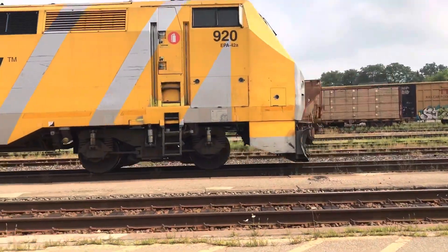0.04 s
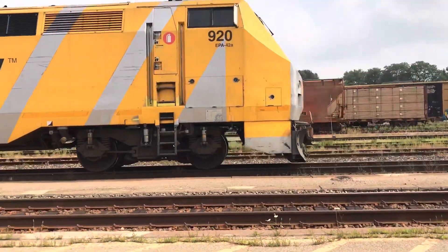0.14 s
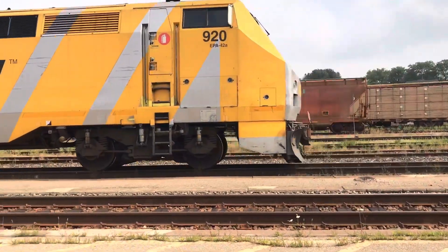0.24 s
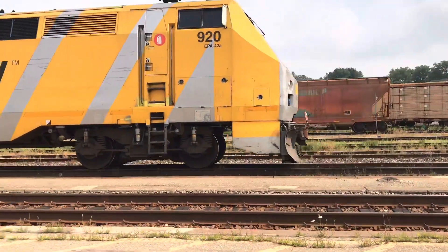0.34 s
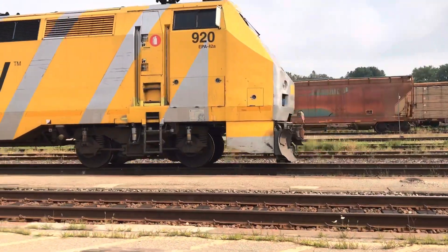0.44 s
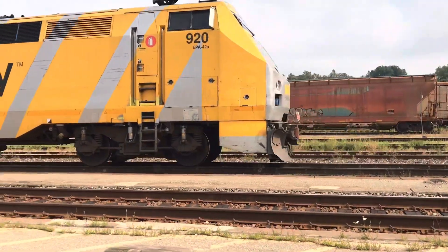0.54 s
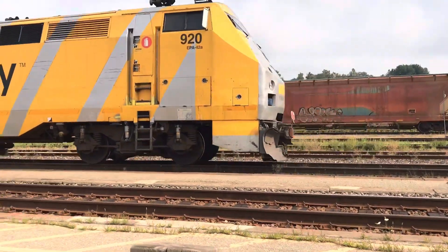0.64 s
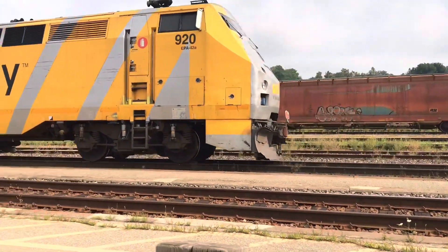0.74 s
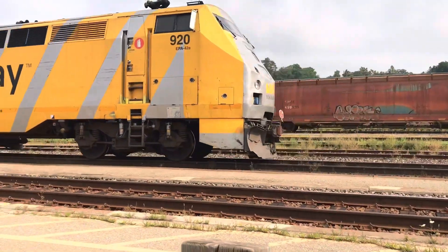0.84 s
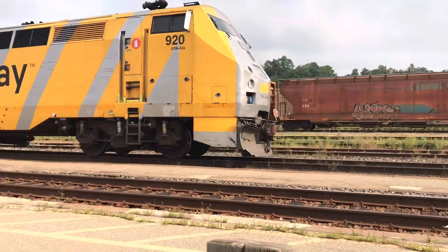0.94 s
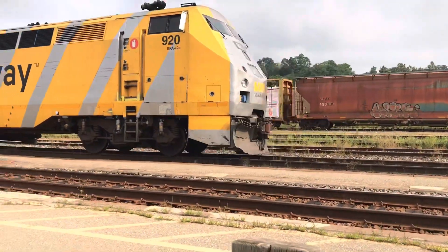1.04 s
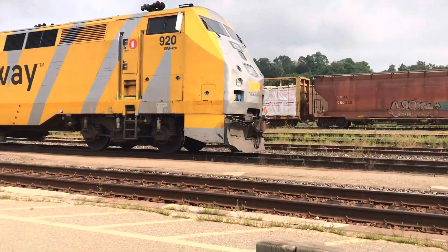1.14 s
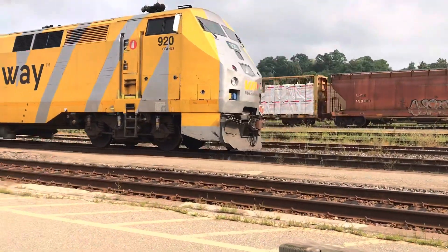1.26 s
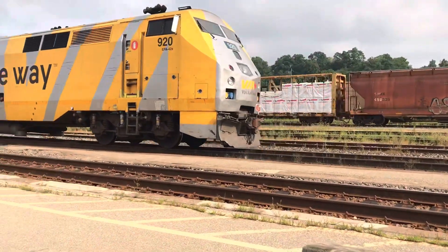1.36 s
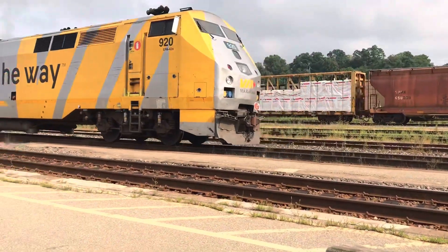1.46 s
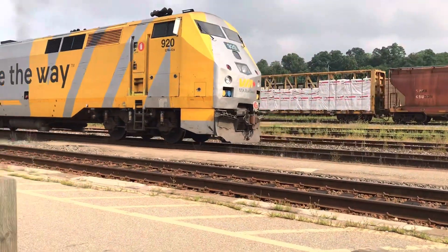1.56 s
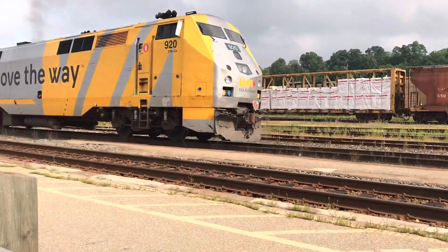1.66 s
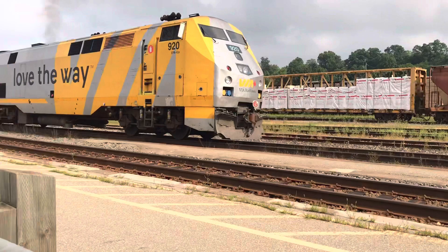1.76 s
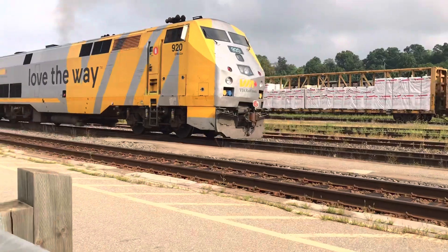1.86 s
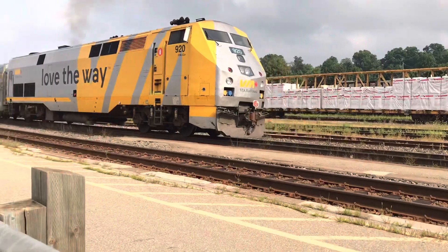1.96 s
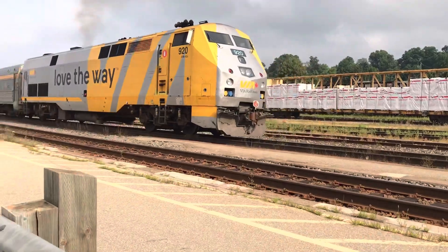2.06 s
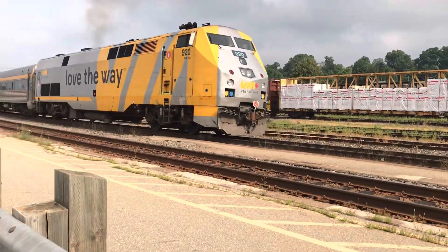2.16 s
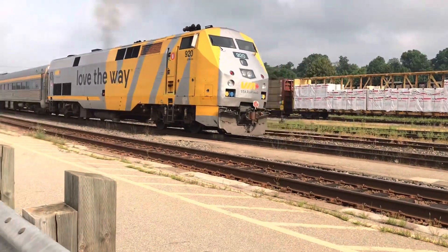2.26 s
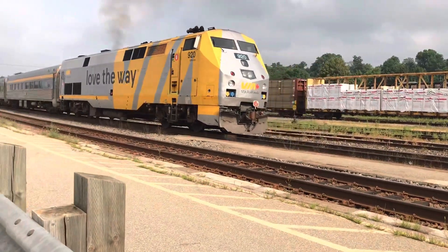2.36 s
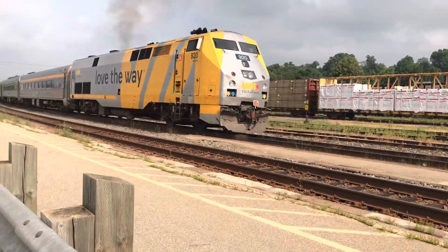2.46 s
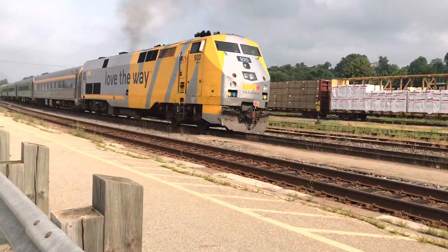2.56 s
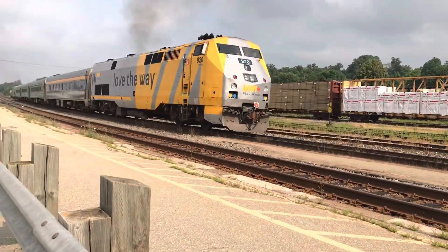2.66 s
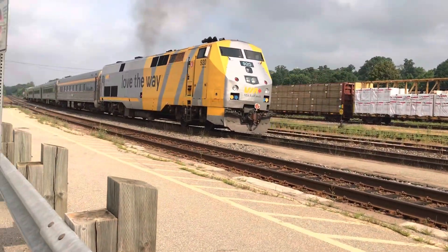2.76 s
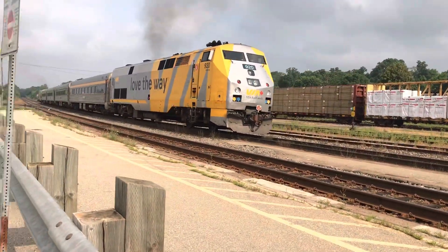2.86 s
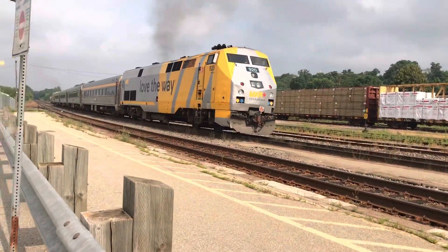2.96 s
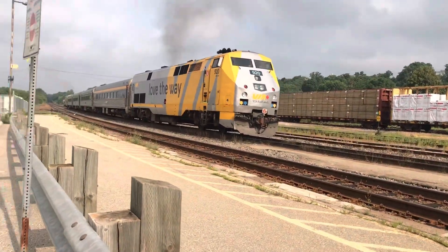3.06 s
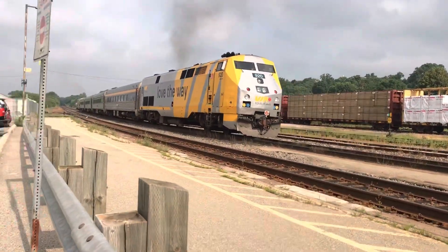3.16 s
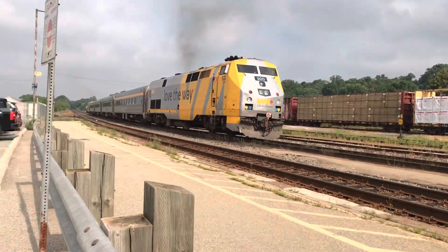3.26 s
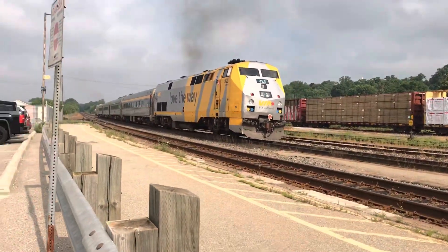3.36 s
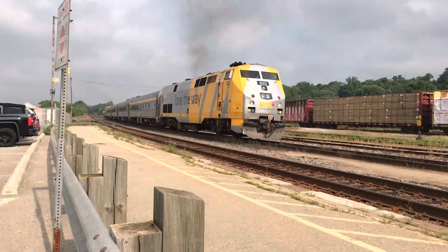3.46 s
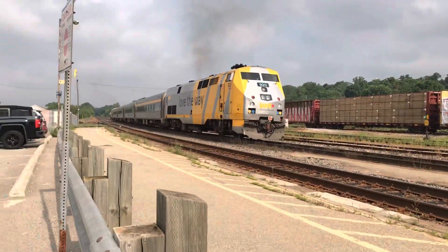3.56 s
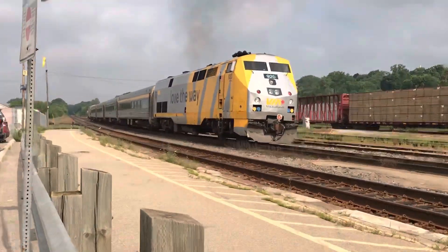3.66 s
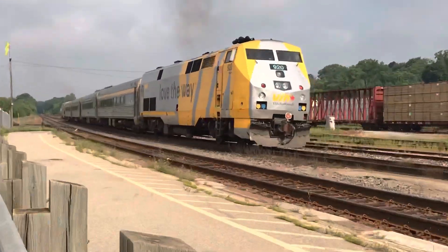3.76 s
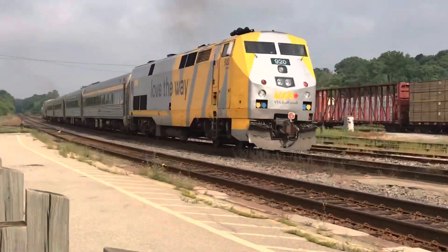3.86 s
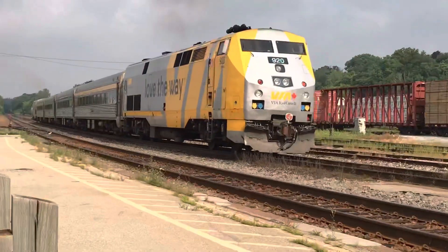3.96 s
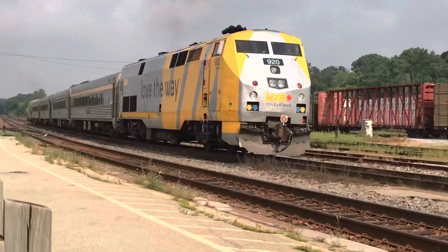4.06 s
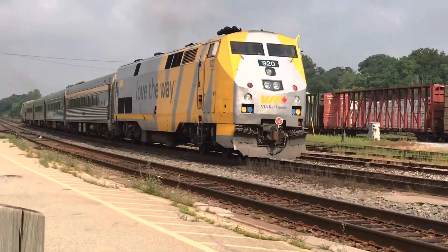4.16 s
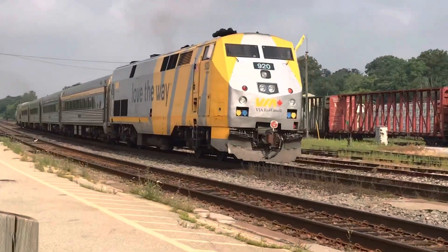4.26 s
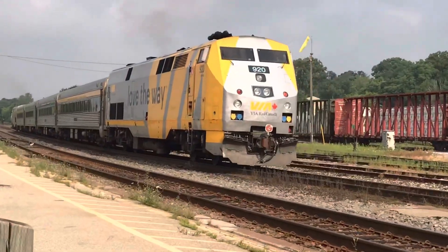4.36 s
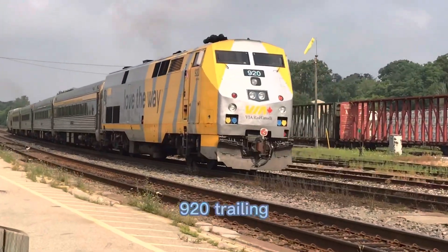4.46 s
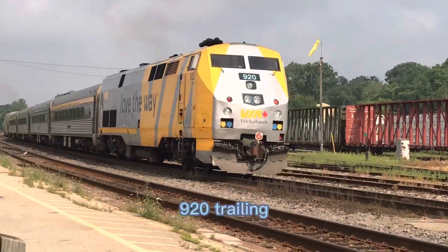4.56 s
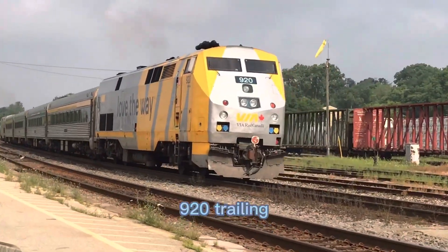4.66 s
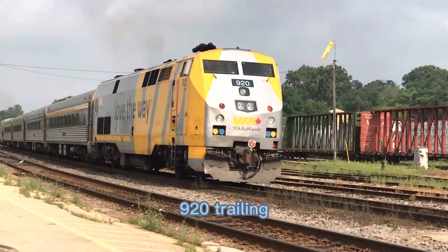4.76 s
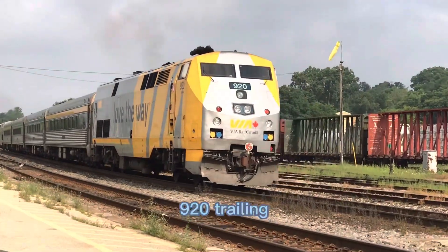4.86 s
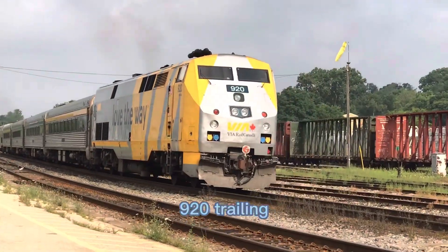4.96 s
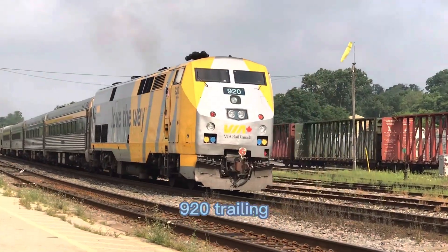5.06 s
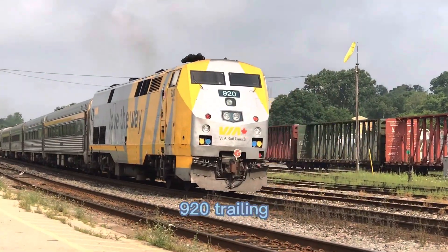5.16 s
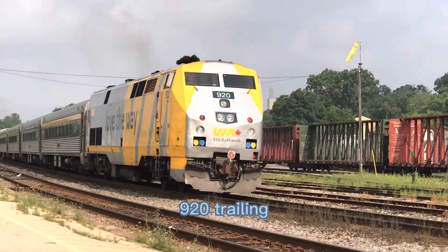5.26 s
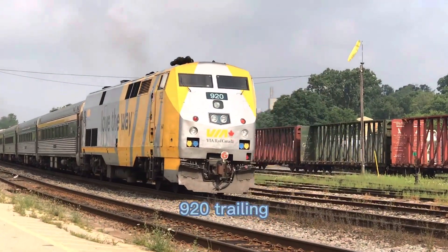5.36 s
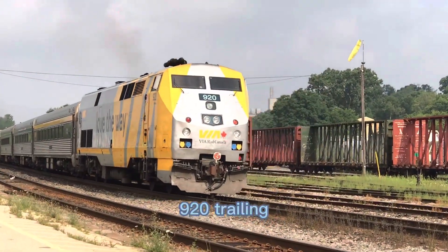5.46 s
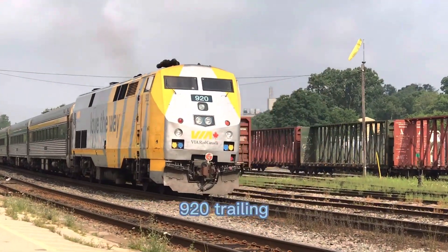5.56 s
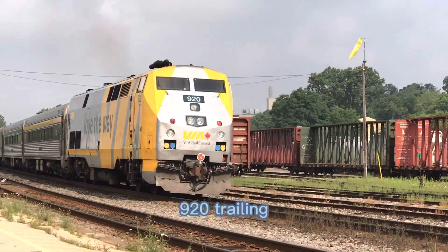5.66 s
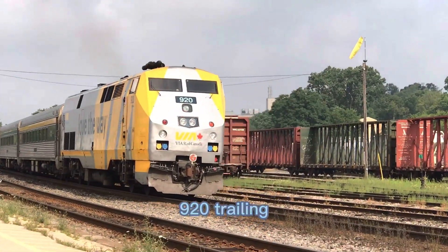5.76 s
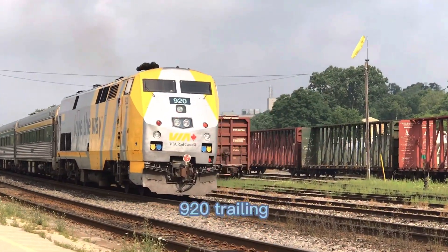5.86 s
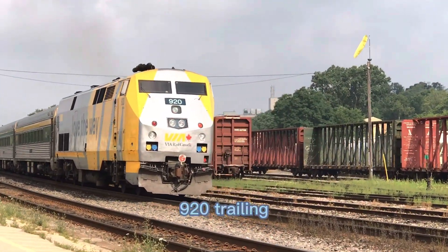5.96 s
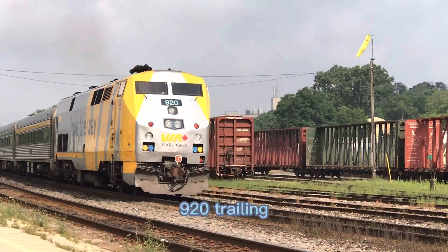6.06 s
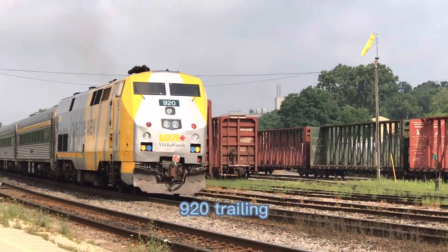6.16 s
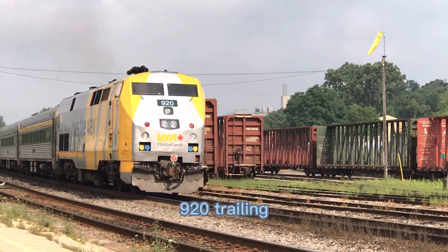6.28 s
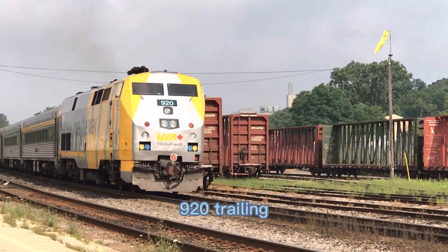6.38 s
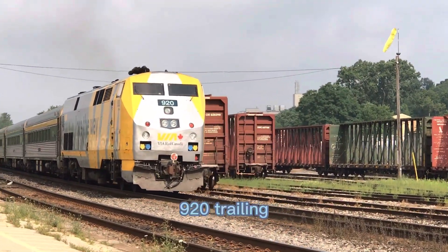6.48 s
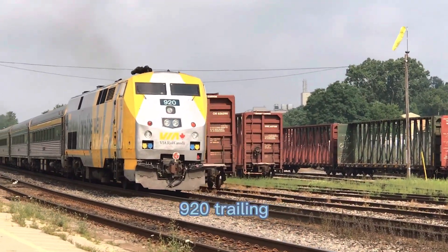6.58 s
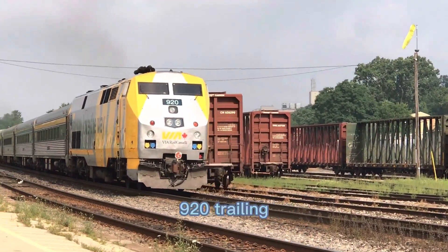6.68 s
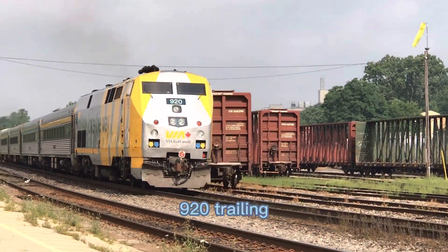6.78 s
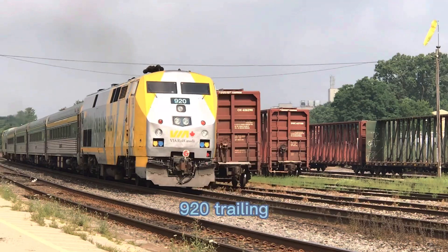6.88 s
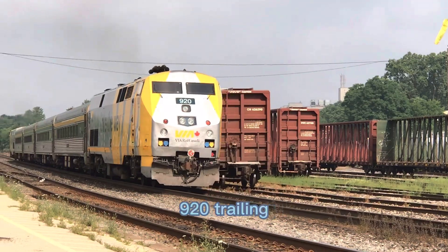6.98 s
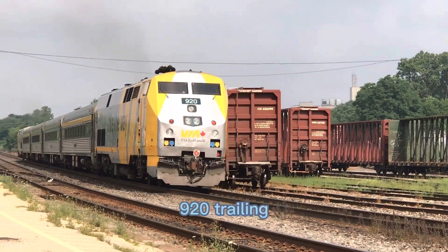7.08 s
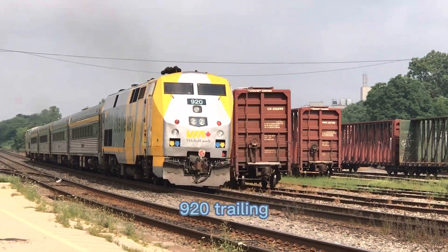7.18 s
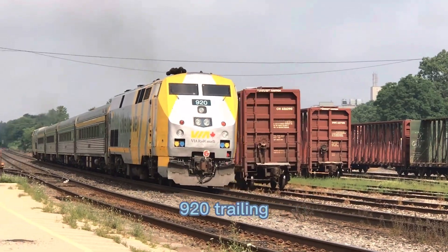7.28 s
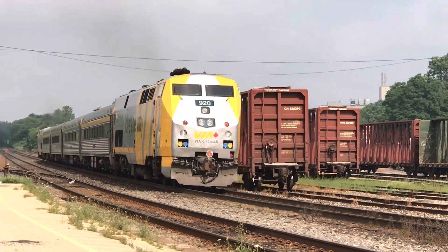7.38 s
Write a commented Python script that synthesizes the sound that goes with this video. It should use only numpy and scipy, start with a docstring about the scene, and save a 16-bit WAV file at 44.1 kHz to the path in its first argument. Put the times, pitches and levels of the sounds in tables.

```python
"""A passenger train rolls slowly out of a station, its idling sixteen-cylinder diesel trailing a few metres away.
From the start the exhaust throbs on multiples of the crank speed, metal clatters with the firings, shaped
noise makes the wheels rumble and scrape, flanges hiss through ringing steel, and rough single notes ring out.
Thumps, knocks and clanks soon follow at the rail joints, most of them in the first three seconds.
Later the rumble fades as the train draws away, an echo thickens the hum, and thin sine tones squeal."""
import sys
import numpy as np
from scipy import signal
from scipy.fft import rfft, irfft, next_fast_len
from scipy.io import wavfile
from scipy.ndimage import uniform_filter1d, map_coordinates

SR = 44100
rng = np.random.default_rng(int(sys.argv[2]) if len(sys.argv) > 2 else 0)


def unload_audio(sound):
    """Save the sound as a 16-bit wav file, at the path given as the first command line argument."""
    columns = np.transpose(np.atleast_2d(sound))
    # keep every value between -1 and 1, then stretch to whole-number steps
    steps = np.round(np.clip(columns, -1, 1) * 32767)
    wavfile.write(sys.argv[1], SR, steps.astype(np.int16))


N = 327663
TIME = np.arange(N) / SR


def undb(db):
    """Turn decibels into a gain."""
    return 10 ** (np.asarray(db) / 20)


def unit(x):
    """Scale to an rms of 1."""
    return x / np.sqrt(np.mean(x ** 2))


def curves(table):
    """Join each column of a table by straight lines in time."""
    seconds, *columns = np.transpose(table)
    return [np.interp(TIME, seconds, column) for column in columns]


def curve(table):
    """Join a table of times and values by straight lines."""
    return curves(table)[0]


def noise():
    """White noise."""
    return rng.standard_normal(N)


def walk(rate):
    """Random levels, each held for 1 / rate seconds and smoothed twice; spread near 1."""
    hold = int(SR / rate)
    steps = np.repeat(noise()[:N // hold + 1], hold)
    return 1.37 * uniform_filter1d(uniform_filter1d(steps, hold), hold)[:N]


def gain_at(hz, spectrum):
    """Read a (Hz, dB) spectrum as gains, with straight lines on a log-frequency axis."""
    points_hz, db = np.transpose(spectrum)
    return undb(np.interp(np.log(hz + 1e-3), np.log(points_hz), db))


def colour(x, spectrum):
    """Filter x by a spectrum; rms 1."""
    size = next_fast_len(N)
    gains = gain_at(np.fft.rfftfreq(size, 1 / SR), spectrum)
    return unit(irfft(rfft(x, size) * gains, size)[:N])


def ring(x, modes):
    """Drive resonances (Hz, width Hz, dB) with x; rms 1."""
    total = 0
    for hz, width_hz, db in modes:
        b, a = signal.iirpeak(hz, hz / width_hz, fs=SR)
        total = total + undb(db) * signal.lfilter(b, a, x)
    return unit(total)


def glide(x, speed):
    """Play x at a changing speed, which moves its whole spectrum; rms 1."""
    return unit(map_coordinates(x, [np.cumsum(speed) % (N - 1)], order=1))


def steel(low_hz, high_hz, width_hz, share, count):
    """Friction noise plus a share of ringing in many sharp modes scattered over a range."""
    places = (np.arange(count) + rng.random(count)) / count
    modes_hz = low_hz + (high_hz - low_hz) * places
    modes_db = 2 * rng.standard_normal(count)
    modes = [(hz, width_hz, db) for hz, db in zip(modes_hz, modes_db)]
    return noise() + share * ring(noise(), modes)


def bout(start, length, attack_s, release_s):
    """Envelope that rises, holds until start + length, then dies away."""
    rise = np.clip((TIME - start) / max(attack_s, 1 / SR), 0, 1)
    return rise * np.exp(-np.maximum(TIME - start - length, 0) / release_s)


def note(hz, width_hz, waver):
    """A rough resonance: a tone wavering by a share of its pitch, roughened to fill its width."""
    pitch_hz = hz * (1 + waver * walk(25)) + .5 * width_hz * walk(150)
    roughness = 1 + .6 * walk(1.5 * width_hz)
    return unit(roughness * np.sin(2 * np.pi * np.cumsum(pitch_hz) / SR))


def streaks(centre_hz, modes):
    """Metal resonances around a moving centre; each wavers, swells and fades on its own."""
    total = 0
    for ratio, db in modes:
        swell = undb(db + 2.2 * walk(16))
        total = total + swell * note(ratio * centre_hz, 70, waver=.008)
    return unit(total)


# How fast the crank spins. Each row: time in seconds, speed in turns per second.
CRANK_SPEED = [(0, 6.83), (.7, 6.945), (1.5, 7.06), (2.3, 7.17), (3.1, 7.28), (3.9, 7.315), (5.1, 7.35),
               (7.43, 7.365)]


def crank_turns():
    """Add up the crank speed into a running count of turns."""
    return np.cumsum(curve(CRANK_SPEED)) / SR


THROB_LEAD = .66  # turns by which the throb leads the crank
SILENCER_SPREAD = .36  # turns per squared multiple; the silencer delays higher lines more, spreading the throb


def crank_line(turns, multiple):
    """One slightly unsteady tone at a multiple of the crank speed."""
    swing = 1 + .06 * (walk(4) + 1j * walk(4))
    phase = multiple * (turns + THROB_LEAD) + SILENCER_SPREAD * multiple ** 2  # in turns
    return np.sqrt(2) * np.real(swing * np.exp(2j * np.pi * phase))


# Exhaust tones in three mixes; only the balance within a mix matters.
# Each row: multiple of the crank speed, level in mix 0 in dB, level in mix 1 in dB, level in mix 2 in dB.
EXHAUST_LINES = [(5, -34, -30, -24), (6, -33, -26, -22), (7, -30, -21, -19), (8, -22, -11, -5),
                 (9, -12, -9, -6), (10, -8, -7, -7), (11, .5, .5, 1), (12, -11, -7, -5), (13, -11, -2, -2),
                 (14, -23, -21, -16), (15, -23, -20, -16), (16, -24, -14, -11), (17, -23, -17, -14)]
# The balance of the exhaust tones, which wanders between the three mixes as reflections shift.
# Each row: time in seconds, mix (0 to 2, blending in between; values outside count as the nearest end).
EXHAUST_BALANCE = [(0, 1.5), (.35, 0.7), (.75, 0.7), (1, -2), (1.3, 0.3), (1.6, 1.3), (2.05, 1.5),
                   (2.4, 0.8), (2.9, 0.84), (3.8, 2.5), (7.4, 2)]
LOPE_DB, LOPE_AT = 1.1, .66  # the strongest cylinders swell the exhaust once a turn, at this share of it
BURN_SCATTER_DB = .5  # uneven burning at idle


def exhaust(turns):
    """Low crank multiples beat into a throb; their balance wanders as reflections shift."""
    mix = curve(EXHAUST_BALANCE)
    total, power = 0, 0
    for multiple, *mixes_db in EXHAUST_LINES:
        gain = undb(np.interp(mix, np.arange(len(mixes_db)), mixes_db))
        total = total + gain * crank_line(turns, multiple)
        power = power + gain ** 2
    lope_db = LOPE_DB * np.cos(2 * np.pi * (turns - LOPE_AT))
    return undb(lope_db + BURN_SCATTER_DB * walk(12)) * total / np.sqrt(power)


def firing(turns):
    """Eight firings a turn, each a dying burst; the two cylinder banks take turns and one hits harder."""
    beat = 8 * turns
    index = beat.astype(int)
    pattern = np.array([2.04, 0.49, 1.15, 0.87, 1.74, -1.1, 1.5, -2.2])  # in steps of 3 dB
    strength = undb(3.0 * pattern[index % len(pattern)] + 2.5 * noise()[index])
    burst = np.exp(-(beat % 1) / 0.96)
    return unit(uniform_filter1d(strength * burst, size=60))


def drone(turns, gate, spectrum):
    """The car body hums with a pattern that repeats each turn, roughened by gas puffs."""
    multiples = np.arange(18, 64)
    size = 4096  # points in one turn of the pattern
    strength = gain_at(multiples * CRANK_SPEED[-1][1], spectrum)  # placed for the final crank speed
    lines = np.zeros(size // 2 + 1, complex)
    lines[multiples] = strength * np.exp(2j * np.pi * rng.random(len(multiples)))
    hum = np.interp(turns % 1, np.arange(size) / size, irfft(lines))
    hum = hum * undb(1.5 * walk(7.4))  # slow unsteadiness
    puffs = colour(noise() * gate, spectrum)
    return unit(unit(hum) + 0.3 * puffs)


# The parked freight cars throw the hum back, stronger and ever sooner as the locomotive draws away.
ECHO_DELAY_S, ECHO_SHRINK_S_PER_S = .1575, .01
ECHO_NEAR, ECHO_FAR, ECHO_FULL_S = .08, .55, 3.8  # gains, and the time of the full echo
DRONE_PEAK_S = 2.1  # the drone is loudest and the echo starts to grow


def yard_echo(x):
    """Add the moving echo, which makes the engine's lines fade and swell one after another."""
    delay = ECHO_DELAY_S - ECHO_SHRINK_S_PER_S * TIME
    gain = np.interp(TIME, [DRONE_PEAK_S, ECHO_FULL_S], [ECHO_NEAR, ECHO_FAR])
    return (x + gain * np.interp(TIME - delay, TIME, x)) / np.sqrt(1 + gain ** 2)


# Loudness of the exhaust before its echo. Each row: time in seconds, level in dB.
EXHAUST_LOUDNESS = [(0, -19), (.45, -18), (.8, -14.5), (1.2, -15), (1.7, -19.5), (2.5, -14.5), (2.9, -18.5),
                    (3.15, -25.5), (3.4, -18), (3.75, -22), (5.6, -24), (6.4, -24.5), (7.43, -23.5)]
# Tone balance of the body hum early on. Each row: frequency in Hz, relative level in dB.
EARLY_DRONE = [(110, -25), (135, 6), (160, -3), (180, 1.5), (195, 2), (204, 8), (213, 3), (240, -3),
               (280, -8), (325, -9), (360, -21), (450, -25), (650, -22)]
# Tone balance of the body hum later. Each row: frequency in Hz, relative level in dB.
LATE_DRONE = [(110, -30), (140, -3), (165, 0), (180, 2), (205, 3), (220, -2), (245, -7), (264, 3),
              (277, -6), (294, 1), (306, -6), (328, 1), (360, -11.5), (450, -16), (650, -45)]
DRONE_DB, DRONE_FADE_DB_PER_S = -28.5, 1.43  # level at the peak; weaker before and after


def engine_hum(turns, gate):
    """Exhaust throb and body drone, together with their echo."""
    late = np.clip((TIME - 3.3) / 1.9, 0, 1)  # the hum's tone balance changes smoothly
    early_part = np.sqrt(1 - late) * drone(turns, gate, EARLY_DRONE)
    late_part = np.sqrt(late) * drone(turns, gate, LATE_DRONE)
    drone_db = DRONE_DB - DRONE_FADE_DB_PER_S * np.abs(TIME - DRONE_PEAK_S)
    throb = undb(curve(EXHAUST_LOUDNESS)) * exhaust(turns)
    return yard_echo(throb + undb(drone_db) * (early_part + late_part))


# Steady clatter of the engine metal. Each row: time in seconds, block level in dB, rattling panels level in dB.
STEADY_CLATTER = [(0, -44, -43.5), (.7, -38, -41.5), (1.9, -41, -41.5), (2.7, -41.5, -35),
                  (3.6, -41, -37.5), (4.5, -37, -38.5), (4.95, -33.5, -39.5), (5.3, -27.5, -34),
                  (5.75, -32, -38), (6.15, -33, -34), (6.36, -36.5, -38), (6.48, -35, -38),
                  (6.9, -36, -34.5), (7.1, -37.5, -42), (7.43, -40.5, -41)]
# Louder bouts of clatter.
# Each row: start in seconds, length in seconds, block level in dB, rattling panels level in dB.
CLATTER_BOUTS = [(1.416, 0.13, -36.5, -53), (2.44, 0.057, -37, -34), (3.27, 0.073, -46, -44),
                 (3.896, 0.12, -34, -47), (4.398, 0.018, -31, -49), (6.29, 0.08, -38, -42),
                 (4.714, 0.11, -48, -32.5), (5.041, 0.054, -27, -51), (5.179, 0.044, -25.5, -32),
                 (5.338, 0.07, -34, -32), (5.435, 0.026, -25, -29), (6.668, 0.044, -33, -35.5),
                 (6.835, 0.052, -39, -45), (6.966, 0.071, -31, -39)]


def metal_gains():
    """Gains of block and panels: steady clatter with louder bouts on top; the panels flicker."""
    block, panels = undb(curves(STEADY_CLATTER)) ** 2
    for start, length, block_db, panels_db in CLATTER_BOUTS:
        shape = bout(start, length, attack_s=0.014, release_s=0.014)
        block = block + (undb(block_db) * shape) ** 2
        panels = panels + (undb(panels_db) * shape) ** 2
    return np.sqrt(block), np.sqrt(panels) * undb(1.35 * walk(15))


# Engine block resonances, before wavering and colouring.
# Each row: frequency in Hz, width in Hz, relative level in dB.
BLOCK_MODES = [(1153, 64, -9), (1374, 46, -4.5), (1419, 36, -1.5), (1489, 48, -6.5), (1550, 48, -1.5),
               (1696, 58, -7.5)]


def block_clatter(gate):
    """Block resonances driven by noise; the firings and uneven strikes of loose metal pulse them."""
    block = 0
    for hz, width_hz, db in BLOCK_MODES:
        swell = undb(db + 2.2 * walk(24))  # each resonance swells on its own
        block = block + swell * ring(noise(), [(hz, width_hz, 0)])
    strikes = (6.7 + gate) * undb(1.5 * walk(110))
    tone = [(800, -18), (1100, -5.5), (1280, 4), (1360, 2.5), (1750, 5), (2600, -7)]
    return colour(glide(block, 1 + .008 * walk(14)) * strikes, tone)


# Centre of the panels' rattle. Each row: time in seconds, frequency in Hz.
PANEL_CENTRE = [(0, 3310), (1.1, 3265), (2.1, 2772), (2.55, 3065), (3.4, 3005), (3.9, 3136), (4.8, 3045),
                (5.3, 2720), (7.43, 2995)]
# Tone balance of the rattle when its centre is at 3000 Hz; it shifts along with the centre.
# Each row: frequency in Hz, relative level in dB.
PANEL_TONE = [(1000, -30), (1900, -6), (2300, -7), (2700, -3), (3050, -2.5), (3250, -2.5), (3550, -9),
              (3900, -13.5), (4300, -10.5), (4700, -13), (5500, -24)]
# Resonances that stand out of the rattle. Each row: multiple of the centre, relative level in dB before swelling.
PANEL_STREAKS = [(.84, -6), (.92, -2), (.98, -2), (1.05, -2)]


def panel_rattle(gate):
    """Ringing panel noise slides with its centre and pulses with the firings."""
    centre_hz = curve(PANEL_CENTRE)
    base = colour(steel(1900, 4800, 45, share=.55, count=24), PANEL_TONE)
    panels = glide(base, (1 + .008 * walk(9)) * centre_hz / 3000)
    return unit((panels + .3 * streaks(centre_hz, PANEL_STREAKS)) * (1.85 + gate))


def engine():
    """Exhaust, body drone, and metallic clatter that pulses with the firings."""
    turns = crank_turns()
    gate = firing(turns)
    block_gain, panel_gain = metal_gains()
    return engine_hum(turns, gate) + block_gain * block_clatter(gate) + panel_gain * panel_rattle(gate)


# Loudness of the rolling roar, fading overall as the train draws away. Each row: time in seconds, level in dB.
ROAR_LOUDNESS = [(0, -29), (2.5, -31.5), (3.5, -34), (4, -32.5), (5.5, -36), (6.98, -35.5), (7.15, -38),
                 (7.43, -40.5)]
# Tone balance of the roar. Each row: frequency in Hz, relative level in dB.
ROAR_TONE = [(25, -31), (42, 16), (100, 6.5), (250, 5), (450, -1), (750, -4), (1100, -1), (1250, -5.5),
             (2000, -8), (4000, -20.5), (8000, -41)]


def rolling_roar():
    """Low coloured noise of wheels rolling, with a flickering level."""
    return undb(curve(ROAR_LOUDNESS) + 1.18 * walk(18)) * colour(noise(), ROAR_TONE)


# Centre of the rail's ring, which wanders. Each row: time in seconds, frequency in Hz.
RAIL_RING_CENTRE = [(0, 2157), (1.1, 2035), (1.65, 2463), (2.15, 2220), (2.55, 1932), (3.1, 1806),
                    (4.4, 1813), (4.8, 1945), (7.43, 1859)]
# Tone balance of the rail when its centre is at 1850 Hz; it shifts along with the centre.
# Each row: frequency in Hz, relative level in dB.
RAIL_TONE = [(1200, -10.5), (1620, 0.5), (1780, -1), (1900, 1.5), (2050, 0.5), (2300, -10), (4000, -50)]
# Resonances that stand out of the ring. Each row: multiple of the centre, relative level in dB before swelling.
RAIL_STREAKS = [(.79, -13.5), (.86, -1.5), (.97, -1.5), (1.04, -1.5), (1.14, -9.5)]


def rail_ring():
    """Rail noise slides with its centre, and wavering resonances stand out of it."""
    centre_hz = curve(RAIL_RING_CENTRE)
    base = glide(colour(noise(), RAIL_TONE), centre_hz / 1850)
    return unit(base + .65 * streaks(centre_hz, RAIL_STREAKS))


# Ringing of the steel wheels, before later colouring.
# Each row: frequency in Hz, relative level in dB before flickering.
STEEL_WHEEL_MODES = [(5020, -22), (5750, 0), (5840, -14), (6080, -18), (7130, 7.5), (7741, 3.5),
                     (8748, 8.5), (9480, 9), (12177, 6), (12860, 4), (13120, -23), (13378, -2),
                     (13647, -10), (13932, -4), (14790, 12.5), (15250, 2)]


def wheel_ring():
    """Friction rings the strongest wheel modes; each swells and fades on its own."""
    total = 0
    for hz, db in STEEL_WHEEL_MODES:
        total = total + undb(db + 3.5 * walk(20)) * ring(noise(), [(hz, 40, 0)])
    return unit(total)


# Moments when the treads slip and scrape harder.
# Each row: start in seconds, length in seconds, level in dB.
TREAD_SLIPS = [(0, 0.032, -32.5), (0.153, 0.076, -37), (0.36, 0.12, -35.5), (0.885, 0.037, -41),
               (4.753, 0.095, -40), (5.431, 0.053, -37)]
# Tone balance of the scrape. Each row: frequency in Hz, relative level in dB.
SCRAPE_TONE = [(2500, -1.5), (3600, 6.5), (4300, 6), (4950, 3.5), (5500, 5.5), (6500, 2.5), (7500, -4),
               (8700, -1.5), (10500, -21), (16000, -48)]


def tread_scrape(steady_db):
    """Steel treads scrape, slipping harder in bouts; the wheels' modes stand out when near."""
    near = np.exp(-TIME / 1.1)
    treads = steel(3300, 8200, 45, share=.22, count=26) + (.12 + 1.2 * near) * wheel_ring()
    power = undb(steady_db) ** 2
    for start, length, db in TREAD_SLIPS:
        power = power + (undb(db) * bout(start, length, attack_s=0.0067, release_s=0.01)) ** 2
    return np.sqrt(power) * undb(1.0 * walk(25.37)) * colour(treads, SCRAPE_TONE)


# Wheels on the rail, before flickering.
# Each row: time in seconds, rail ring level in dB, steady tread scrape level in dB.
WHEEL_LOUDNESS = [(0, -46, -38), (1.15, -44, -39.5), (1.9, -39, -37.5), (2.15, -37.5, -37),
                  (2.6, -37, -35.5), (2.95, -35.5, -33), (3.25, -36, -38), (3.6, -39, -38),
                  (4.3, -43, -39.5), (4.75, -34.5, -37), (5.35, -40, -39.5), (5.65, -42, -43.5),
                  (5.92, -40, -38.5), (6.15, -37, -37.5), (6.48, -48, -44.5), (6.9, -39.5, -40.5),
                  (7.1, -45, -48.5), (7.43, -42, -49)]


def wheels():
    """Rolling roar, ringing rail and the scrape of the treads."""
    rail_db, scrape_db = curves(WHEEL_LOUDNESS)
    rail = undb(rail_db + 1.5 * walk(20)) * rail_ring()
    return rolling_roar() + rail + tread_scrape(scrape_db)


# Times when a flange presses on the rail.
# Each row: start in seconds, length in seconds, level at the start in dB, time to bite in seconds.
RUBS = [(0, 0.67, -27, 0.0014), (0.666, 1.16, -30.5, 0.081), (1.879, 0.18, -27.5, 0.11),
        (2.144, 0.37, -36.5, 0.04), (2.537, 0.62, -28, 0.16), (3.227, 0.43, -27.5, 0.17),
        (4.01, 0.52, -26, 0.18), (4.598, 0.21, -28, 0.089), (4.82, 0.37, -29.5, 0.18),
        (5.779, 0.24, -28.5, 0.0085), (6.466, 0.27, -30.5, 0.13), (7.071, 0.076, -45.5, 0.018)]
FLANGE_IDLE_DB = -62  # light contact between the rubs
RUB_SAG_DB_PER_S, RUB_RELEASE_S = 2.5, 0.11
RING_ON_DB, RING_ON_S = -7, .135  # the wheel rings on after the flange lets go


def flange_gain():
    """Each rub bites, sags, lets go and rings on."""
    power = undb(FLANGE_IDLE_DB) ** 2
    for start, length, db, bite_s in RUBS:
        rub = bout(start, length, bite_s, RUB_RELEASE_S)
        ring_on = undb(RING_ON_DB) * bout(start, length, bite_s, RING_ON_S)
        sagging_db = db - RUB_SAG_DB_PER_S * np.clip(TIME - start, 0, length)
        power = power + (undb(sagging_db) * np.maximum(rub, ring_on)) ** 2
    return np.sqrt(power)


# Tone balance of the flange hiss. Each row: frequency in Hz, relative level in dB.
HISS_TONE = [(5000, -17), (7800, -12.5), (8800, -7), (10500, -4.5), (11600, -1.5), (13000, 3.5),
             (15000, 2.5), (16000, 1)]


def flange_hiss():
    """Flanges grind the rail and excite many high wheel modes."""
    grind = steel(8400, 15700, 30, share=0.49, count=56) + 0.41 * wheel_ring()
    return flange_gain() * undb(1.0 * walk(35)) * colour(grind, HISS_TONE)


# Wheels, rail, bogie or engine metal ring at one resonance, for a moment or up to a second.
# Each row: start in seconds, length in seconds, pitch in Hz, width in Hz, level in dB.
SINGING_NOTES = [(0, 0.021, 4270, 300, -39), (0, 0.17, 286, 14, -37.5), (.15, .083, 5900, 100, -45),
                 (0.378, 0.049, 6070, 140, -39), (.41, 0.12, 7750, 50, -46), (0.45, 0.34, 234, 9.1, -34),
                 (.59, .075, 2050, 70, -39), (.6, 0.06, 3680, 90, -40), (.71, .05, 5770, 85, -50),
                 (.885, .04, 6060, 110, -42), (.882, 0.029, 9600, 202, -42), (1.234, 0.19, 1630, 70, -39),
                 (2.12, .13, 2170, 140, -37), (2.24, 0.058, 2300, 60, -38), (2.427, .08, 1560, 46, -37),
                 (2.44, .32, 3050, 130, -47), (2.58, 0.066, 2340, 43, -42), (2.6, .08, 1870, 68, -39),
                 (2.835, 0.2, 1850, 80, -38.5), (2.849, .09, 2370, 62, -40), (2.85, .24, 1594, 37, -38),
                 (3.134, 0.051, 1860, 74, -36), (3.165, .14, 1456, 39, -39), (3.249, .12, 1754, 60, -35.5),
                 (3.498, 0.92, 1117, 114, -47), (3.673, .36, 3070, 260, -41), (4.2, 0.66, 3170, 250, -45),
                 (4.751, .098, 4250, 176, -45), (5.53, .16, 3000, 56, -47), (5.846, .35, 4300, 400, -47),
                 (6.09, .17, 1400, 28, -36), (6.1, 0.24, 1550, 63, -36.5), (6.12, 0.044, 2450, 70, -44),
                 (6.545, 0.32, 4350, 220, -54), (6.636, .07, 2640, 160, -43), (6.64, .07, 1820, 69, -45),
                 (6.842, .04, 3060, 58, -34.5), (6.938, 0.043, 3140, 70, -39)]


def sings():
    """Metal rings at one resonance, for a moment or up to a second: a rough, wavering note."""
    total = 0
    for start, length, hz, width_hz, db in SINGING_NOTES:
        shape = bout(start, length, attack_s=0.0067, release_s=0.016)
        total = total + undb(db) * shape * note(hz, width_hz, waver=0.0072)
    return total


# Wheels dropping into rail joints.
# Each row: time in seconds, thump level in dB, thump tilt in dB per octave, knock level in dB,
# knock pitch in Hz, gritty clank level in dB, clank decay in seconds.
RAIL_JOINTS = [(0.101, -29, 11, -25, 836, -40, .025), (.209, -26, 9, -37, 600, -38, .025),
               (0.602, -22.5, 1, -30, 450, -40, .02), (0.655, -19, -1, -27, 455, -35, .035),
               (.961, -21, 4, -23, 690, -32, .03), (1.137, -23.5, 5.5, -25, 600, -33, .029),
               (1.422, -19.5, -1, -22, 850, -30, .025), (1.457, -24, 1, -19, 1020, -31, .016),
               (1.581, -24, -1, -37, 600, -42, .02), (1.781, -22, 0, -19, 900, -26, .025),
               (1.812, -23, 2, -29, 500, -35, .02), (1.905, -34, 2, -16.5, 620, -29, .029),
               (2.096, -27, -6, -22, 600, -30, .03), (2.146, -25, -4, -27, 550, -35, .027),
               (2.384, -24, 2, -11, 484, -31, .035), (2.569, -26, -3, -22, 470, -33, .025),
               (2.956, -28, 8, -40, 600, -43, .02), (4.998, -39, 0, -22, 594, -40, 0.012),
               (5.785, -46, 2, -22, 477, -42, .02)]
# What the bogie rings with, before each joint's small pitch change and tilt.
# Each row: frequency in Hz, time to fall by 60 dB in seconds, relative level in dB.
BOGIE_MODES = [(58.4, .13, -9), (125, .11, -7), (202, .3, -9), (234, .11, 2.5), (280, .09, -3),
               (324.4, .21, .5), (355, .09, -5), (397, .16, -12)]
# The knock of the wheel's rim.
# Each row: multiple of the knock pitch, time to fall by 60 dB in seconds, relative level in dB.
RIM_KNOCK = [(.82, .075, -10), (1, .06, -6), (1.3, .03, -13), (2, .018, -20)]
JOINT_PUSH_S = .002  # a slow wheel settles into the gap instead of striking it


def joints():
    """Each wheel drops into the gap: the rim knocks, grit clanks, and the bogie rings low."""
    t = TIME[:SR // 2]
    clank_tone = [(150, -8.0), (450, 13), (600, 5), (900, 5), (1100, 5), (1400, -14), (4000, -3), (10000, -70)]
    grit = colour(noise(), clank_tone)
    push = 1 - np.exp(-t / JOINT_PUSH_S)
    out = np.zeros(N + len(t))
    for start, thump_db, tilt_db, knock_db, knock_hz, clank_db, clank_s in RAIL_JOINTS:
        i = int(start * SR)
        thump, knock = 0, 0
        for hz, t60, mode_db in BOGIE_MODES:
            pitch_hz = hz * (1 + 0.0071 * rng.standard_normal())  # a little different each time
            level_db = mode_db + tilt_db * np.log2(hz / 236) - 60 * t / t60
            thump = thump + undb(level_db) * np.sin(2 * np.pi * (pitch_hz * t + rng.random()))
        for ratio, t60, mode_db in RIM_KNOCK:
            knock = knock + undb(mode_db - 60 * t / t60) * np.sin(2 * np.pi * ratio * knock_hz * t)
        clank = np.exp(-t / clank_s) * grit[i:i + len(t)]
        hit = undb(thump_db) * thump + undb(knock_db) * knock + undb(clank_db) * clank
        out[i:i + len(t)] += hit * push
    return out[:N]


# Pure flange squeals, before small wavers in pitch and level.
# Each row: start in seconds, end in seconds, pitch in Hz, level in dB.
FLANGE_SQUEALS = [(3.6, 4.0, 15040, -48), (3.647, 4.001, 15310, -48), (4.5, 5.75, 14830, -52),
                  (6.006, 6.497, 14815, -47), (6.699, 7.051, 14830, -47)]


def squeals():
    """Now and then a flange locks into a thin, slightly wavering tone."""
    total = 0
    for start, end, hz, db in FLANGE_SQUEALS:
        swell = np.clip(np.minimum(TIME - start, end - TIME) / 0.067, 0, 1)
        tone = np.sqrt(2) * np.sin(2 * np.pi * np.cumsum(hz + 14 * walk(40)) / SR)
        total = total + swell * undb(db + 1.3 * walk(14)) * tone
    return total


def scene():
    """Add all the sources; one microphone feeds both channels."""
    mix = engine() + wheels() + flange_hiss() + sings() + joints() + squeals()
    return np.tile(mix, (2, 1))


def record(dry):
    """The phone drops the deepest rumble and cuts the top; the sound stops without a click."""
    rumble_cut = signal.butter(2, 28, "highpass", fs=SR, output="sos")
    top_cut = signal.ellip(12, .1, 80, 15780, fs=SR, output="sos")  # steep low-pass
    fade = np.minimum((TIME[-1] - TIME) / .008, 1)
    return signal.sosfilt(top_cut, signal.sosfilt(rumble_cut, dry) * fade)


dry = scene()
out = record(dry)
unload_audio(out)
```